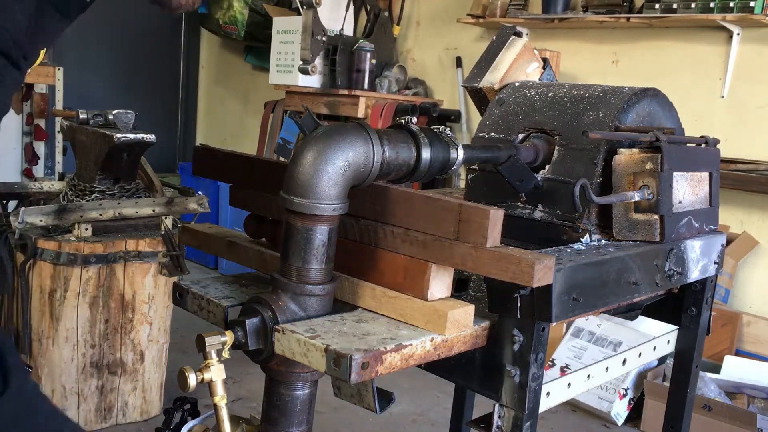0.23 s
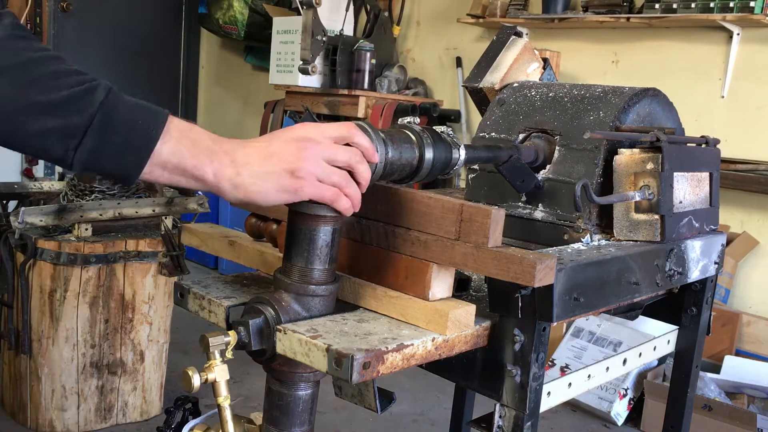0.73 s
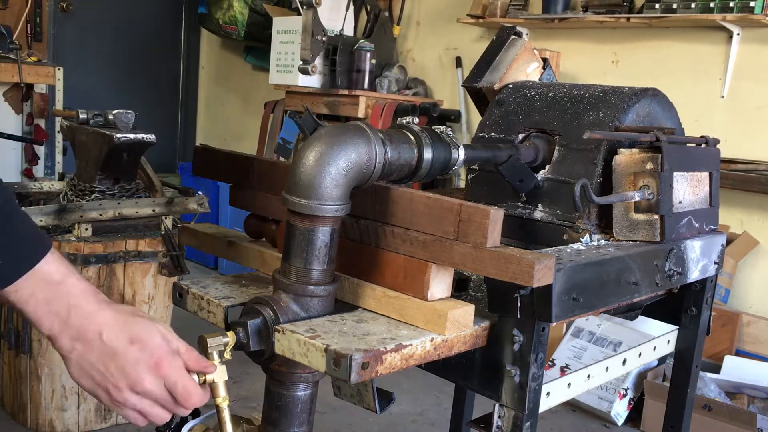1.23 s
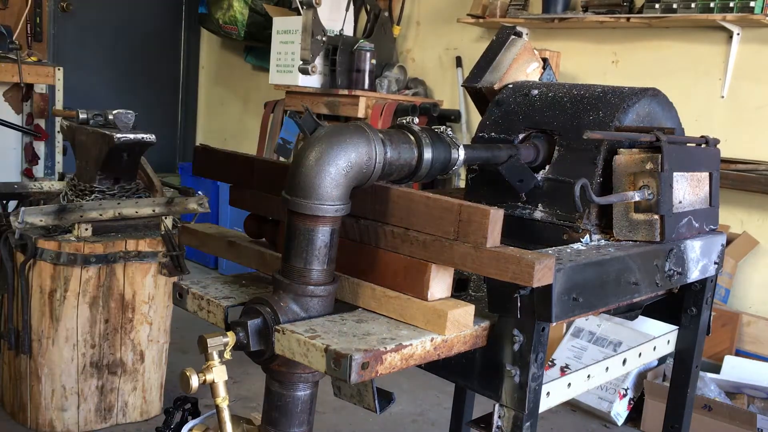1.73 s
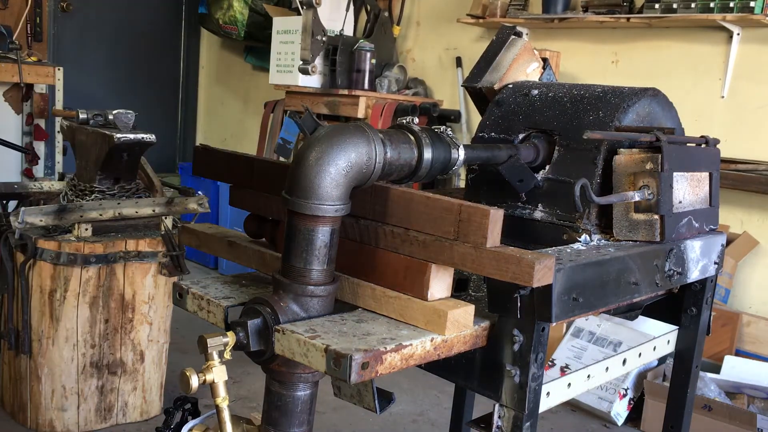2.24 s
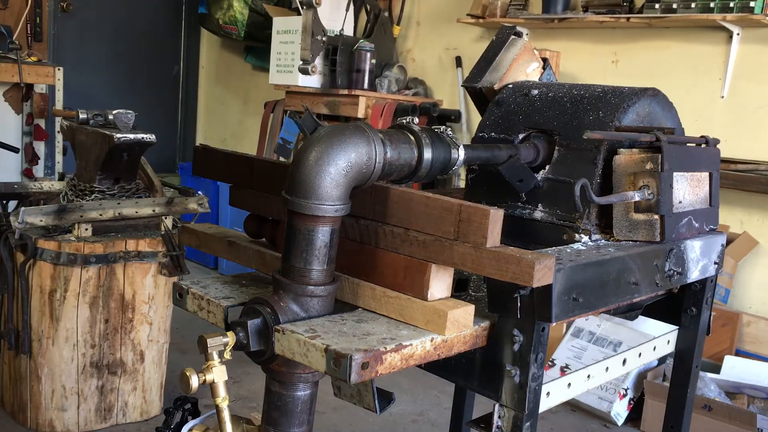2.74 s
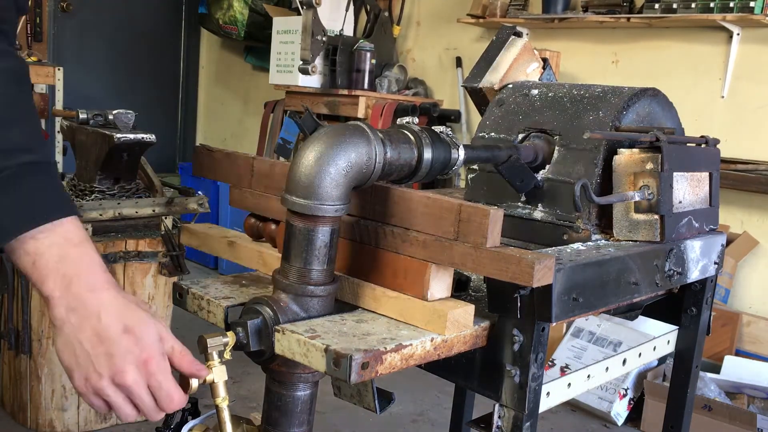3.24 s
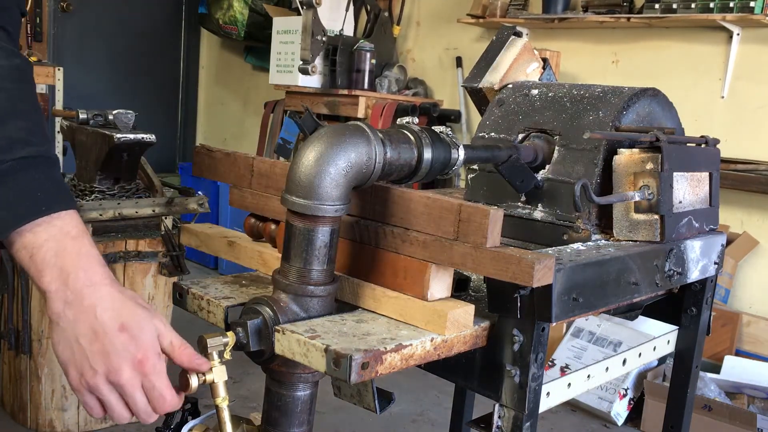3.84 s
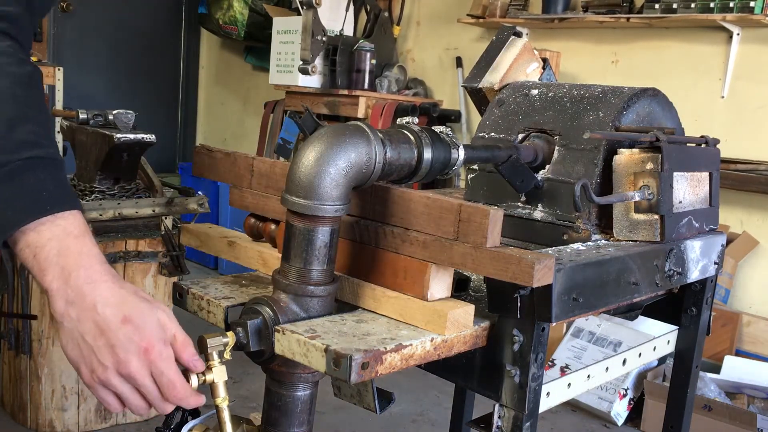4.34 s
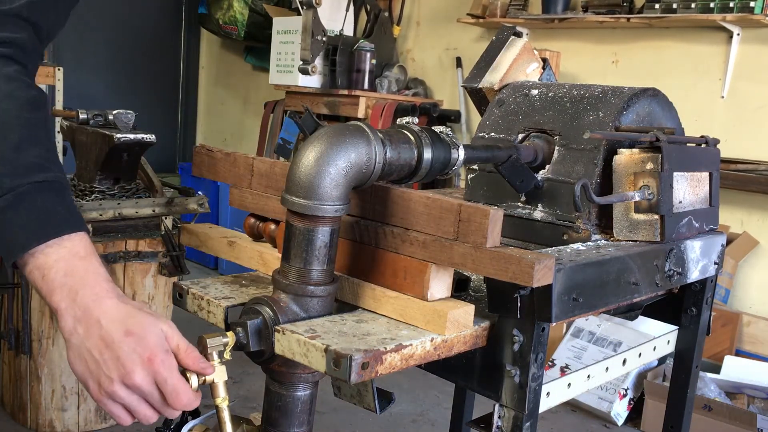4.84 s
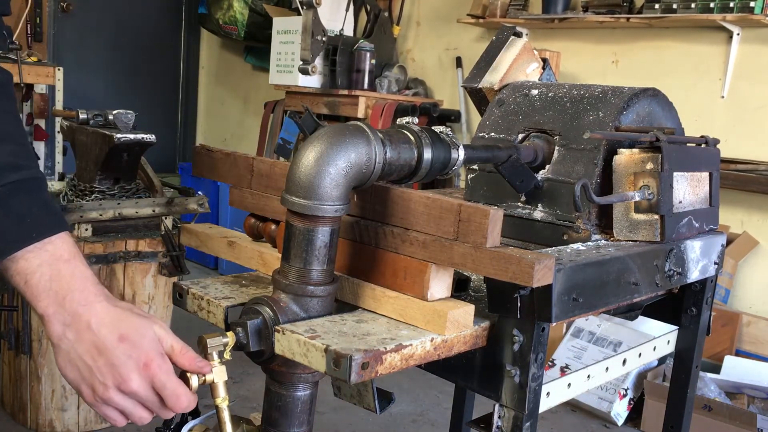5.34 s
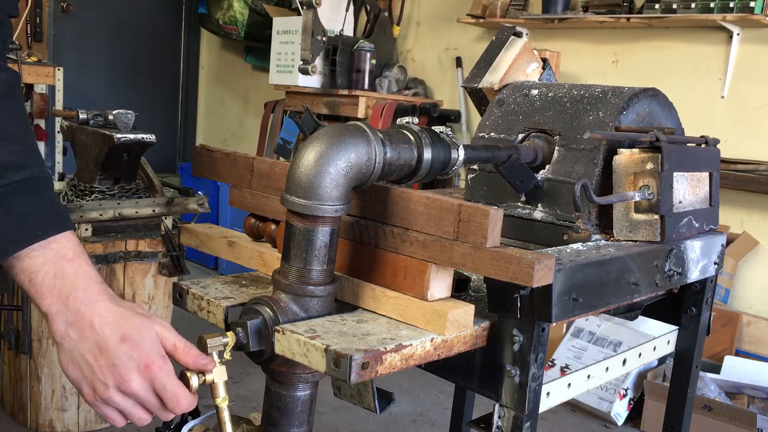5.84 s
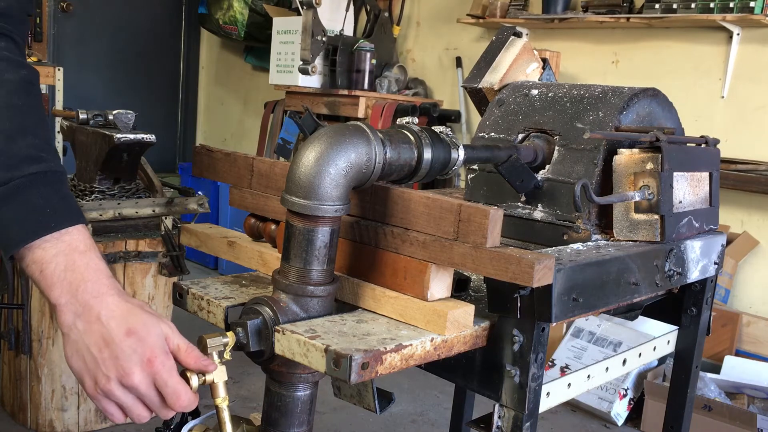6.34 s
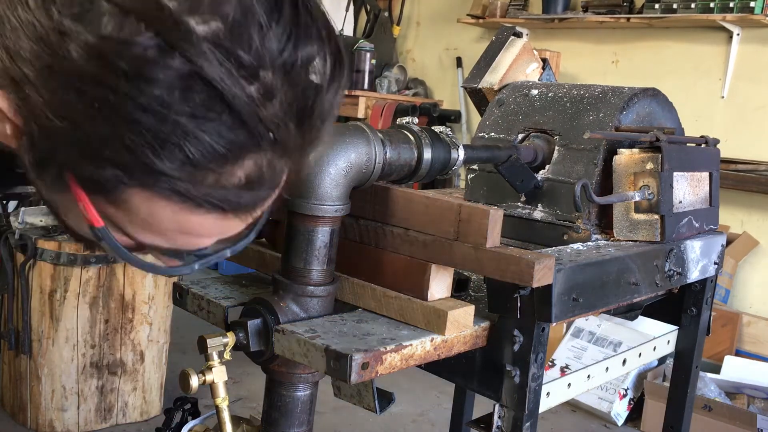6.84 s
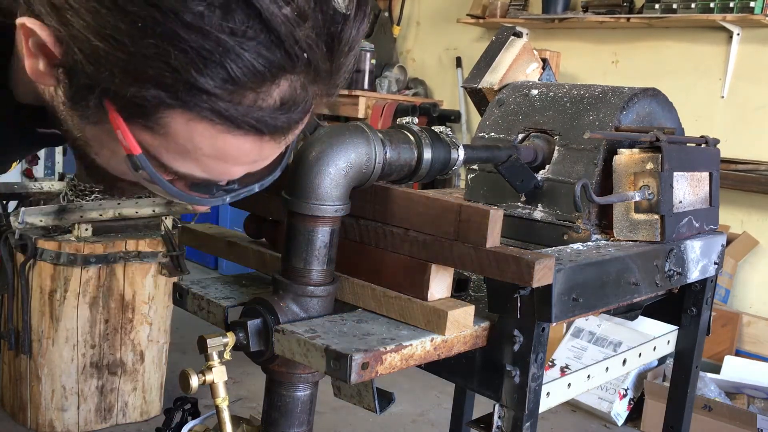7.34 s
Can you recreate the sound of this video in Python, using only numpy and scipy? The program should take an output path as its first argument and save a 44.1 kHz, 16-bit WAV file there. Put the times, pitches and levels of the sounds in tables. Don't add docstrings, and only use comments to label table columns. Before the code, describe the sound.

Steady rushing flame noise fills the whole stretch, strongest in the midrange, ringing like air through iron pipe. A needle-thin gas whistle flutters at first, then steadies, with faint side tones from the fan blades. As the valve is trimmed the roar thins for a while and comes back slightly softer than before. One close microphone, bass cut, same sound in both channels.

```python
import sys
import numpy as np
from scipy import signal
from scipy.fft import rfft, irfft, next_fast_len
from scipy.io import wavfile
from scipy.ndimage import uniform_filter1d, map_coordinates

SR = 44100
rng = np.random.default_rng(int(sys.argv[2]) if len(sys.argv) > 2 else 0)


def generate_wav(sig):
    pcm = np.round(np.clip(np.atleast_2d(sig).T, -1, 1) * 32767).astype(np.int16)
    wavfile.write(sys.argv[1], SR, pcm)


def level_to_linear(level):
    exponent = np.asarray(level, float) / 20
    return 10 ** exponent


N = 334719
TIME = np.arange(N) / SR


def unit(x):
    return x / np.sqrt(np.mean(x ** 2) + 1e-20)


def along(points, hz):
    point_hz, value = np.transpose(points)
    return np.interp(np.log(hz + 1), np.log(point_hz + 1), value)


def curves(rows):
    s, *columns = np.transpose(rows)
    return [np.interp(TIME, s, column) for column in columns]


def bumps(rows):
    s, half_s, *columns = np.transpose(rows)
    coarse_time = TIME[::64]
    bell = np.exp(-((coarse_time[:, None] - s) / half_s) ** 2)
    return [np.interp(TIME, coarse_time, bell @ column) for column in columns]


def wobble(rate):
    knots = rng.standard_normal(int(N * rate / SR) + 4)
    return map_coordinates(knots, [TIME * rate])


def filtered(x, response):
    m = next_fast_len(N + SR // 2)
    f = np.fft.rfftfreq(m, 1 / SR)
    return irfft(rfft(x, m) * response(f), m)[..., :N]


def tone(hz):
    cycles = np.cumsum(hz + 0 * TIME) / SR
    return np.sqrt(2) * np.sin(2 * np.pi * (cycles + rng.random()))


def patchy(x, drift_db, patch_db):
    z = signal.stft(x, nperseg=512)[2]

    def field(high, long):
        noise = rng.standard_normal(z.shape)
        smooth = uniform_filter1d(noise, size=high, axis=0)
        return unit(uniform_filter1d(smooth, size=long, axis=1))

    gain = level_to_linear(drift_db * field(high=1, long=200) + patch_db * field(high=6, long=10))
    return signal.istft(z * gain, nperseg=512)[1][:N]


def workshop(x, wet_db, t60):
    t = np.arange(SR // 4) / SR
    tail = rng.standard_normal(len(t)) * level_to_linear(-60 * t / t60)
    wet = signal.fftconvolve(x, tail / np.linalg.norm(tail))[:N]
    return (x + level_to_linear(wet_db) * wet) / np.sqrt(1 + level_to_linear(2 * wet_db))


# time in seconds, blades passing per second in Hz.
BLADE_SPEED = [(0, 2101.2), (2, 2100.4), (7.59, 2099.6)]


def blade_rate():
    return curves(BLADE_SPEED)[0]


# time in seconds, third overtone in dB, fifth overtone in dB.
BLADES = [(0, -54, -72), (1.8, -59, -75), (3.3, -57, -61), (4, -61, -63), (5.5, -66, -58), (6.5, -67, -65),
          (6.75, -56, -65), (7.59, -53, -62)]
# pitch in Hz, level in dB.
HUM = [(6482, -65), (7021, -69)]


def blower():
    blade_hz = blade_rate()
    third_db, fifth_db = curves(BLADES)
    out = np.zeros(N)
    for k, db in enumerate((-62, -57, third_db, -70, fifth_db), start=1):
        out += level_to_linear(db + 2.1 * wobble(2.48)) * tone(k * blade_hz)
    for hz, db in HUM:
        out += level_to_linear(db + 3.2 * wobble(2.53)) * tone(hz)
    return out


# frequency in Hz, level in dB per Hz.
HISS = [(8900, -60), (9300, -1.5), (9900, -4.5), (10250, -4), (10600, 0), (11300, -3), (11800, 0),
        (12700, -4), (13150, -1), (13350, -7), (13750, -8), (14050, -3), (14700, -5), (16000, -5)]


def hiss():
    noise = patchy(rng.standard_normal(N), drift_db=1.7, patch_db=2.0)
    high = filtered(noise, lambda f: level_to_linear(along(HISS, f)))
    return level_to_linear(-48.2) * unit(workshop(high, wet_db=-10, t60=.08))


# time in seconds, how far the flame sags in dB.
GAS = [
    (0, 0),
    (2.2, 0.16),
    (3.0, 0.64),
    (4.5, 5),
    (5.5, 1.4),
    (6.2, 1.8),
    (7.59, 1.4),
]


def flame_sag():
    return curves(GAS)[0]


# time in seconds, pitch in Hz.
PITCH = [(0, 12216), (1.3, 12229), (2.1, 12241), (2.5, 12257), (2.95, 12250), (3.2, 12234), (3.85, 12248),
         (4.35, 12241), (4.95, 12252), (5.4, 12237), (5.85, 12242), (6.55, 12231), (7.59, 12226)]
# time in seconds, level in dB.
STRENGTH = [(0, -41), (1.35, -35.5), (2.3, -42.5), (3.0, -41.5), (3.07, -36.5), (4.4, -36), (5.75, -40),
            (6.25, -34.8), (7.59, -38)]
# time in seconds, half length in seconds,
# change of the whistle in dB, of its lower blade side tone in dB, of its upper one in dB.
SHADES = [(.02, .025, 0, 3, 0), (.06, .02, -2, -5, 0), (.145, .02, -3, -6, -5), (.22, .045, 5, 8, -6),
          (.325, .03, -4, -9, 0), (.39, .04, 0, 0, 0), (.49, .04, -8, 11, 5), (.57, .05, -1, 5, 7),
          (.66, .03, -2, -3, 2), (.8, .08, -3, 5, 2), (1.1, .04, 0, 3, 3), (1.2, .025, -6, -2, 3),
          (1.28, .04, 2, 6, 3), (1.65, .08, -1.5, -1, 0), (1.97, .09, 4, -2, -5), (2.7, .3, 1.5, 1, -7),
          (3.18, .07, 3, 2, 7), (3.26, 0.027, -7, 2, 3), (3.97, .08, 1, 2, 0), (4.5, .04, 3, 1, 6),
          (6.6, .07, 1, -3, 5), (6.78, .07, 3.5, -3, -6), (7.07, .06, 1, 2, 5), (7.21, 0.066, -5, 0, 4)]


def whistle():
    slow_hz, = curves(PITCH)
    strength_db, = curves(STRENGTH)
    tone_db, lower_db, upper_db = bumps(SHADES)
    unrest, = curves([(0, 3.3), (1.5, 2.4), (1.8, 1.1), (7.59, .9)])
    hz = slow_hz + 2.5 * unrest * wobble(35) + 3 * wobble(300)
    flicker_db = 0.67 * wobble(40) + 0.65 * wobble(75) + 0.55 * wobble(8)
    out = level_to_linear(strength_db + tone_db + flicker_db) * tone(hz)

    lean_db = -14 * np.maximum(TIME - 7.1, 0)
    lower_db = lower_db + 0.8 * flame_sag() + lean_db
    shaft_db = 0.26 * (slow_hz - 12228)
    blade_hz = blade_rate()
    shaft_hz = blade_hz / 6
    # distance from the tone in Hz, lower and upper level in dB, their changes in dB
    sides = ((blade_hz, -57.8, -62, lower_db, upper_db),
             (shaft_hz, -71.5, -71.5, shaft_db, .6 * shaft_db))
    for step_hz, low_db, high_db, down_db, up_db in sides:
        low_flicker_db = .35 * unrest * wobble(30) + 0.65 * wobble(40)
        out += level_to_linear(low_db + down_db + low_flicker_db) * tone(hz - step_hz)
        high_flicker_db = 1.2 * wobble(40) + 1.3 * wobble(6)
        out += level_to_linear(high_db + up_db + high_flicker_db) * tone(hz + step_hz)
    return out


# level in dB at full flame, for rumble, roar, rush and air stream.
FULL_DB = [-40.5, -29, -35, -42.5]
# dB lost per dB of sag, for the same four layers.
SAG_SHARE = [1.16, 0.92, 0.81, -0.22]
# time in seconds, half length in seconds, change of the rumble in dB.
FLARES = [
    (0.01, .1, 1.5),
    (2.02, 0.4, 4.5),
    (3.0, .45, -2.5),
    (3.9, .3, -2),
    (4.4, 0.27, 3.5),
    (5.0, .12, -1.5),
    (6.5, .15, 1.5),
    (7.02, .12, 1.6),
]


def flame_levels():
    sag_db = flame_sag()
    rumble_db, *upper_db = [db - share * sag_db for db, share in zip(FULL_DB, SAG_SHARE)]
    return [rumble_db + bumps(FLARES)[0], *upper_db]


# pitch in Hz, width in Hz, level in dB, sign of the swing.
FIREBOX = [(204, 100, -27.4, 1), (323, 35, -8.4, -1), (376, 49, -9.5, 1), (496, 59, -4.1, -1),
           (580, 74, -6.8, 1), (646, 33, -9.5, -1), (745, 52, -6.6, 1), (823, 58, -7.3, -1),
           (951, 68, 1.2, 1), (1074, 132, 1.1, -1), (1172, 45, -4.2, 1), (1244, 50, -0.8, 1),
           (1308, 22, -8.9, 1), (1404, 55, -1.1, -1), (1496, 41, -0.5, -1), (1621, 50, 7.6, 1),
           (1790, 109, 4.0, -1), (1917, 400, -2.7, 1), (2050, 53, 0.1, -1), (2190, 35, -4.0, 1),
           (2283, 37, -4.2, -1), (2465, 77, -1.1, 1), (2579, 117, -1.3, -1), (2683, 151, -2.2, 1),
           (2819, 78, 3.4, -1), (2844, 66, 3.0, 1), (3051, 61, 0.7, -1), (3106, 24, -1.7, 1),
           (3178, 31, -1.8, -1), (3413, 54, -5.5, 1)]
# pitch in Hz, width in Hz, level in dB, sign of the swing.
PIPE = [(3697, 136, -9.1, -1), (3908, 126, -8.0, -1), (4056, 43, -5.2, 1), (4149, 96, -4.7, -1),
        (4232, 74, -2.9, 1), (4440, 38, -14.1, -1), (4541, 38, -12.4, 1), (4644, 53, -14.4, -1),
        (4745, 32, -15.7, 1), (4878, 103, -16.3, -1), (5058, 35, -13.7, 1), (5237, 72, -19.3, -1),
        (5379, 38, -15.2, 1), (5579, 136, -21.1, -1), (5814, 94, -15.3, 1), (6012, 246, -18.9, -1),
        (6352, 71, -17.0, 1), (6591, 55, -23.4, -1), (6832, 104, -1.5, 1), (6831, 136, -2.3, -1),
        (7154, 79, -19.0, 1), (7375, 129, -22.9, -1), (7637, 68, -22.0, 1), (7817, 169, -26.5, -1),
        (8108, 94, -22.7, 1), (8458, 400, -27.5, -1), (8721, 66, -25.2, 1), (8834, 69, -25.9, -1),
        (9042, 65, -23.0, 1), (9179, 66, -25.9, -1)]
# pitch in Hz, width in Hz, depth in dB.
NOTCHES = [(439, 36, 3.1), (616, 26, 3.4), (1000, 120, 10.7), (1042, 51, 8.2), (1199, 22, 3.5),
           (1465, 13, 2.2), (1599, 120, 16.9), (1743, 58, 5.7), (2396, 45, 5.2), (2480, 120, 14.4),
           (2641, 120, 10.2), (2726, 54, 9.7), (3049, 110, 14.8), (3533, 120, 11.3), (3805, 80, 8.9),
           (3974, 67, 6.5), (4094, 30, 4.6), (4591, 34, 7.8), (4795, 21, 3.2), (8497, 69, 5.9),
           (8918, 77, 7.2)]


def ironwork(f):
    ring = 0
    for center, width, db, sign in list(FIREBOX) + list(PIPE):
        damping = 1j * f * width
        ring = ring + sign * level_to_linear(db) * damping / (center * center - f * f + damping + 1e-9)
    for center, width, depth_db in NOTCHES:
        ring *= 1 - (1 - level_to_linear(-depth_db)) * width / (width + 2j * (f - center))
    return ring


# border in Hz between throb, rumble, roar, rush and air stream.
SPLIT_HZ = [290, 750, 2500, 4450]


def burner():
    bursts = level_to_linear(1.3 * wobble(300) + .1 * wobble(40))
    noise = patchy(bursts * rng.standard_normal(N), drift_db=.7, patch_db=.1)
    m = next_fast_len(N + SR // 2)
    f = np.fft.rfftfreq(m, 1 / SR)
    eddies = rfft(noise, m)
    iron = ironwork(f)

    below = [0 * f]
    below += [1 / (1 + (f / hz) ** 8) for hz in SPLIT_HZ]
    below += [1 / (1 + (f / 9330) ** 60)]

    rumble_db, *upper_db = flame_levels()
    throb_db = 1.365 * rumble_db - 2.0
    drive = np.zeros(N)
    for low, high, db in zip(below, below[1:], [throb_db, rumble_db, *upper_db]):
        band = eddies * (high - low)
        heard = np.std(irfft(band * iron, m)[:N])
        drive += level_to_linear(db - 0.96) * irfft(band, m)[:N] / heard
    return irfft(rfft(drive, m) * iron, m)[:N]


def scene():
    flame = workshop(burner(), wet_db=-19, t60=.25)
    mono = flame + hiss() + whistle() + blower()
    return np.array([mono, mono])


# frequency in Hz, level in dB per Hz.
DEEP = [(20, -8), (50, -5), (100, -2), (150, 0), (170, 0), (200, -60)]


def deep_floor():
    rumble_db, roar_db = flame_levels()[:2]
    floor = unit(filtered(rng.standard_normal(N), lambda f: level_to_linear(along(DEEP, f))))
    return level_to_linear(.4 * rumble_db + .9 * roar_db - 41 + 2.5 * wobble(14)) * floor


def band_limit(x):
    return signal.sosfilt(signal.butter(12, 16520, fs=SR, output="sos"), x)


def record(dry):
    def cut(f):
        return (f < 15750) / np.sqrt(1 + (176 / (f + 1)) ** 32)

    mix = filtered(dry, cut) + deep_floor()
    return band_limit(mix)


dry = scene()
out = record(dry)
generate_wav(out)
```